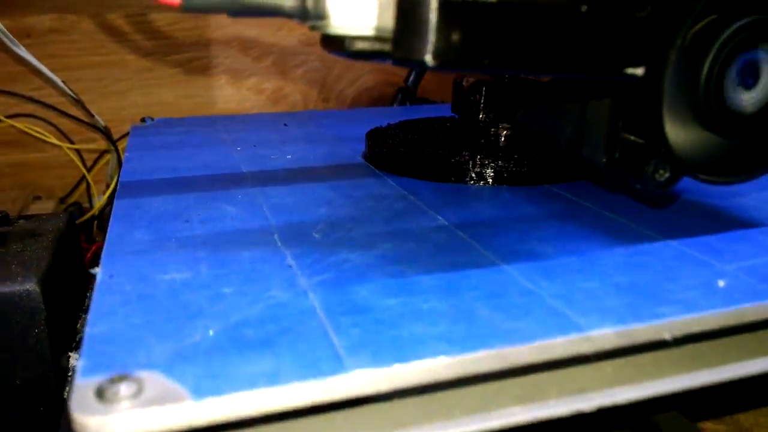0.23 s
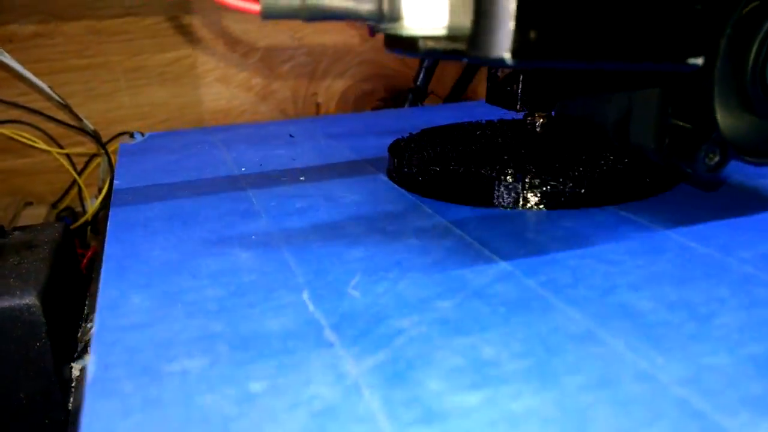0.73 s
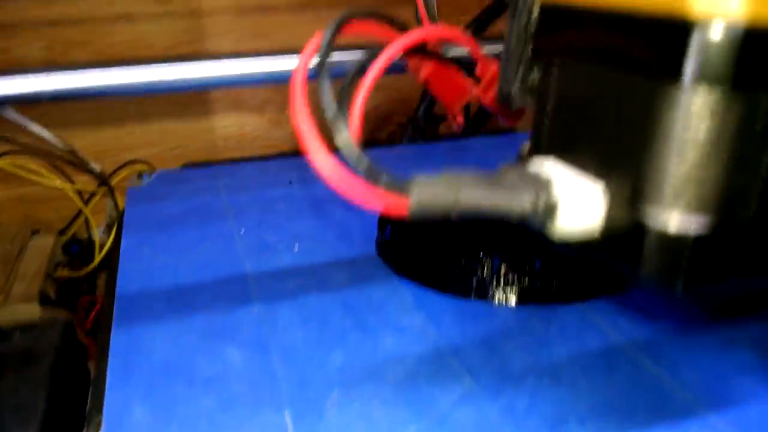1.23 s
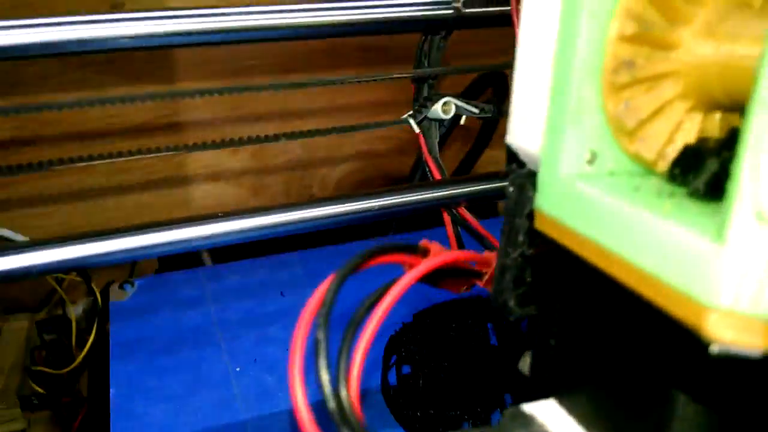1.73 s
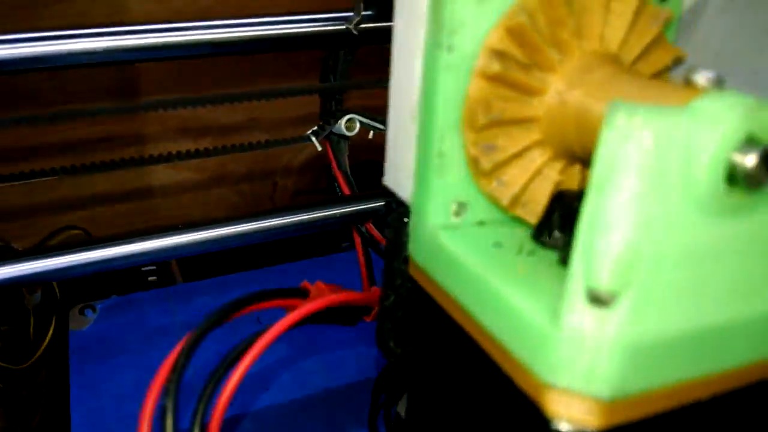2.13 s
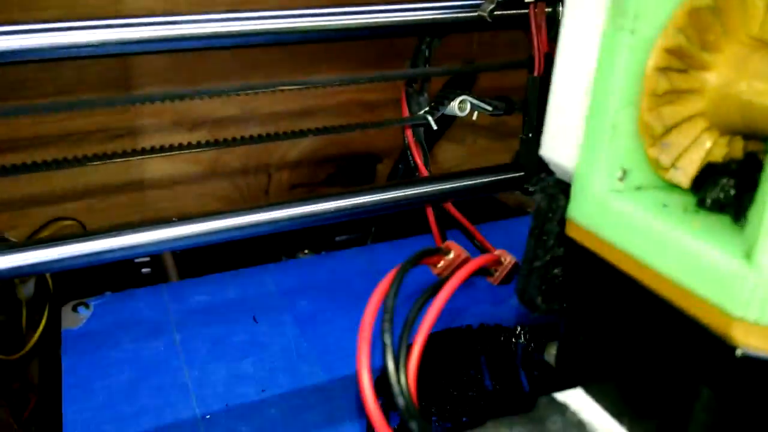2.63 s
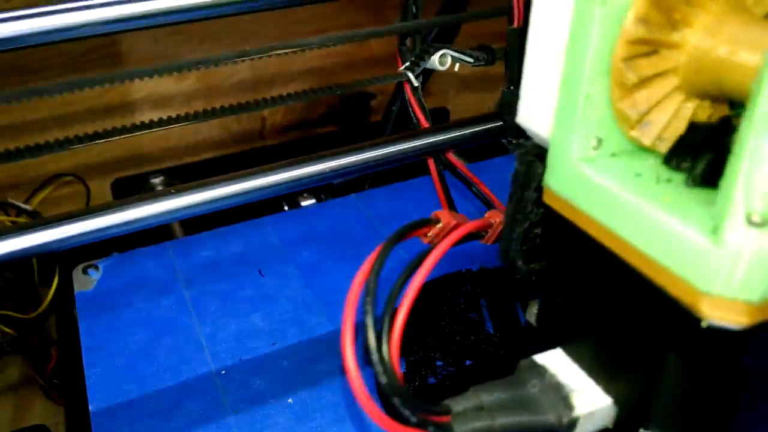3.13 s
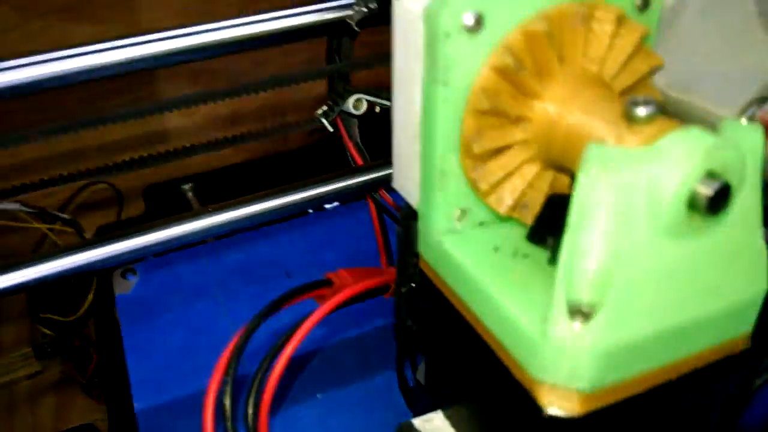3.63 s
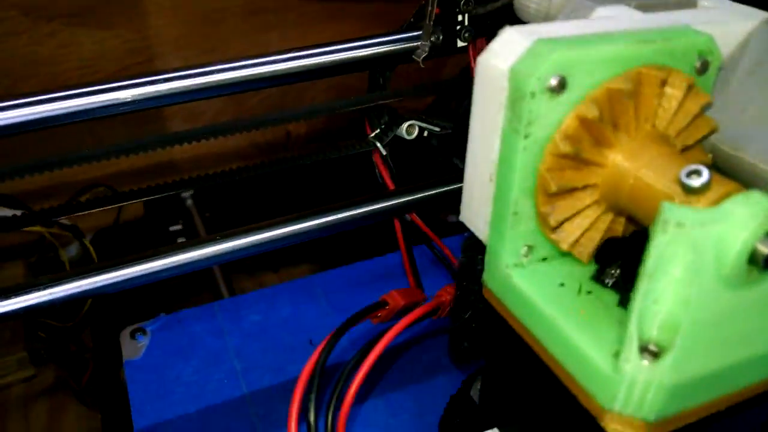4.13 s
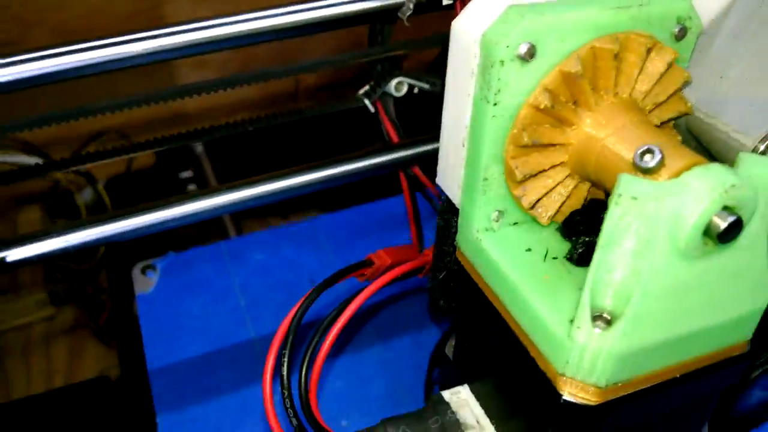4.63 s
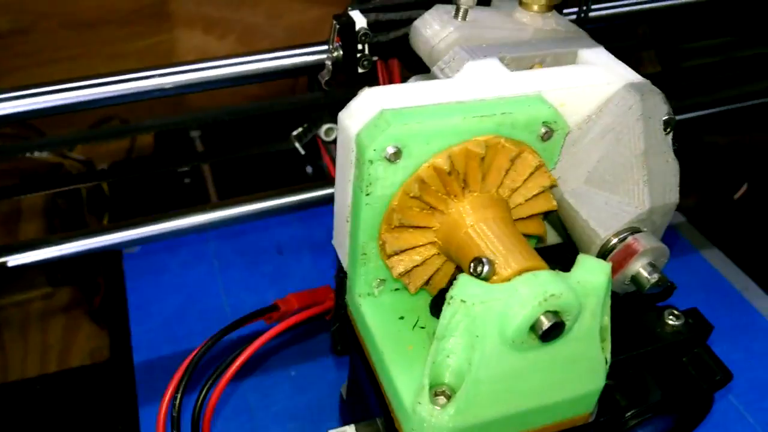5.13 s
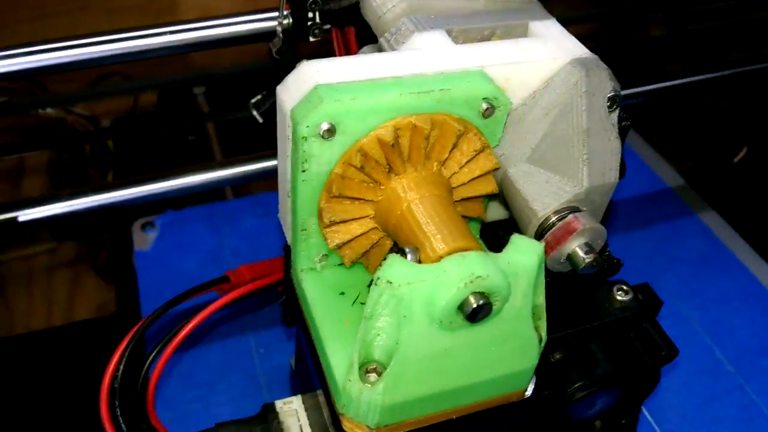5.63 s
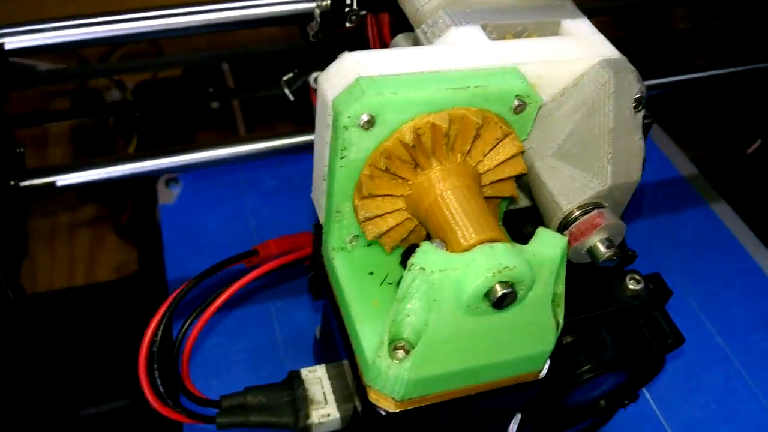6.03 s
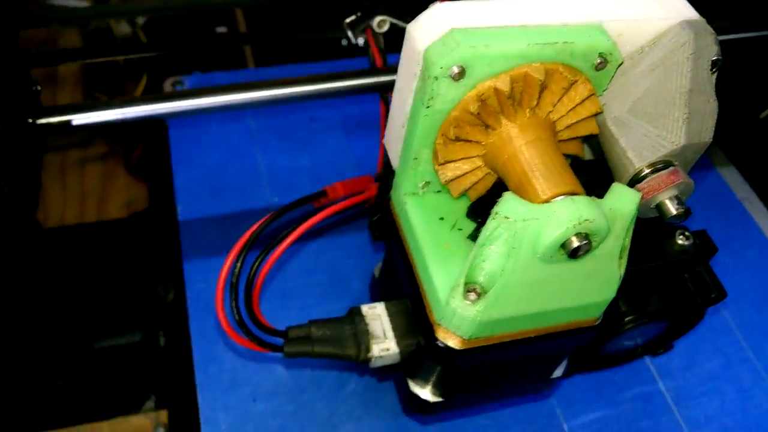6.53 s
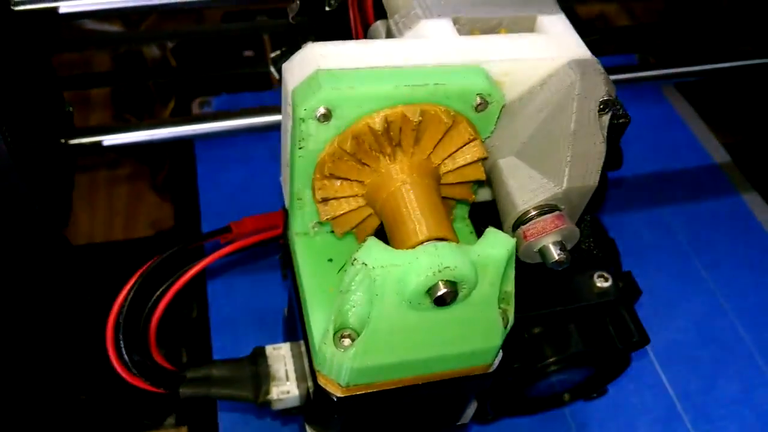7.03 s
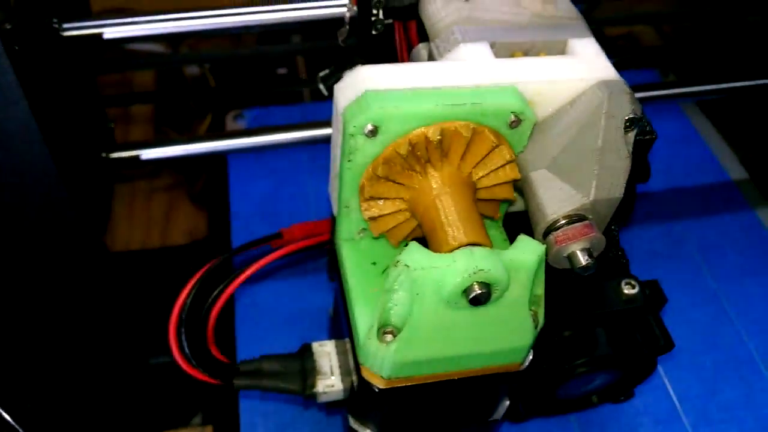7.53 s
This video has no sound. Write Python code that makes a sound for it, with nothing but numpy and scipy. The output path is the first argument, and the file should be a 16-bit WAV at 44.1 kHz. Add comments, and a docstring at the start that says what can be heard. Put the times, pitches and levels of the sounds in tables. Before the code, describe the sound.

Close up, printer motors sweep up, hold piercing tones and drop again, broken by stuttering jogs, bed rumbles and one sharp plastic knock.

```python
"""Singing chirps of a desktop 3D printer laying infill, close to a two-port camera microphone: long strokes and jogs.
Two stepper motors ramp up, cruise and brake, as sines at their step rates, rung through the frame.
Swelling low sines make short shudders of the bed; noise bands rattle, scrape, tick, bump and whistle.
Coloured noise and unsteady hum lines make fans and bearings; damped sines make one sharp knock.
Stereo widening and a gain control that ducks after peaks finish the sound."""
import sys
import numpy as np
from scipy import signal
from scipy.fft import rfft, irfft, next_fast_len
from scipy.io import wavfile
from scipy.ndimage import uniform_filter1d

SR = 44100
rng = np.random.default_rng(int(sys.argv[2]) if len(sys.argv) > 2 else 0)


def generate_wav(signal):
    """Clip the signal to [-1, 1] and save it as 16-bit WAV at the path in sys.argv[1]."""
    frames = np.transpose(np.atleast_2d(signal))
    scaled = np.clip(frames, -1, 1) * 32767
    pcm = np.round(scaled).astype(np.int16)
    wavfile.write(sys.argv[1], SR, pcm)


N = 343098

STROKE_S = .52  # every long stroke lasts this long
CRUISE_MM_S, CORNER_MM_S, ACCEL_MM_S2 = 70, 8, 970
# long strokes, out and back on each heading in turn: start t/s, heading, fast motor level/dB,
# slow motor level/dB, overtones level/dB, rise of the fast motor along the stroke/dB
STROKES = [(.347, "a", 3, 1, -0.5, 0), (.849, "b", -.5, -19, -1.5, -9), (1.762, "b", -3, -6.5, -3, 15),
           (2.294, "c", -1, 3, -1, -3), (3.237, "c", -3.5, 2, -1, 0), (3.747, "a", 0.5, -12, 0, -3),
           (4.68, "a", -2, -7.5, -0.5, -1), (5.198, "b", -4, -8.5, -2.5, 7), (6.093, "b", .5, -7, -2, 13),
           (6.618, "c", -3, -0.5, -5.5, 0), (7.558, "c", -1.5, 0.5, -3.5, 1)]
# two modes of the print bed: f/Hz, width/Hz
BED_MODES = [(255, 58), (500, 65)]


def undb(db):
    """Turn decibels into an amplitude factor."""
    return 10 ** (np.asarray(db) / 20)


def walk(rate, size):
    """A smooth random wander with spread near 1, given `rate` new points a second."""
    at = np.arange(size) * rate / SR
    count = int(at[-1]) + 2
    points = np.clip(rng.standard_normal(count), -2, 2)
    return 1.17 * np.interp(at, np.arange(count), points)


def shape(x, gain):
    """Filter by a gain given as a function of frequency."""
    size = next_fast_len(len(x) + 512)
    f = np.arange(size // 2 + 1) * SR / size + 1e-3
    return irfft(rfft(x, size) * gain(f), size)[:len(x)]


def bell(f, hz, width):
    """A resonance curve, 1 at its centre."""
    return 1 / (1 + (2 * (f - hz) / width) ** 2)


def band(hz, width, size):
    """Noise ringing in one resonance, rms 1."""
    resonance = lambda f: 1 / (1 + ((f / hz - hz / f) * hz / width) ** 2)
    x = shape(rng.standard_normal(size), resonance)
    return x / x.std()


def add(out, start, x):
    """Mix x into out from a start time in seconds."""
    i = int(start * SR)
    lo, hi = max(i, 0), min(i + len(x), N)
    out[lo:hi] += x[lo - i:hi - i]


def bursts(table, grain_db):
    """Short bursts of grainy band noise: quick fades at the ends, a level falling in between."""
    out = np.zeros(N)
    for s, length, hz, width, db in table:
        size = int(length * SR)
        grains = band(hz, width, size) * undb(grain_db * walk(395, size))
        envelope = signal.windows.tukey(size, .2) * np.linspace(1.2, .7, size)
        add(out, s, undb(db) * grains / grains.std() * envelope)
    return out


def steppers():
    """Each move ramps up, cruises and brakes; all tones follow the speed. Returns the sound and the speed."""
    # step rates at cruising speed on each heading: fast motor f/Hz, slow motor f/Hz
    step_rates = {"a": (5163, 2137.3), "b": (4436, 3402), "c": (5545, 729.7), "d": (4274, 2137.3)}
    # full-step hum, harmonics, sum and difference tones of the motors on each heading; they reach the moving
    # camera differently on early and late strokes: f/Hz at cruising speed, early level/dB, late level/dB
    overtone_lines = {"a": [(322, -30, -27.5), (491, -35, -40.5), (644, -41.5, -46), (969, -49, -56),
                      (1044, -48, -45), (1132, -56, -44.5), (1290, -52, -57), (1410, -60, -51),
                      (1615, -60, -52), (1706, -60, -57), (1940, -46, -40), (4180, -45, -50),
                      (4300, -52, -54), (4517, -55, -49), (4820, -41, -46), (5486, -54, -48),
                      (7460, -46, -44), (10340, -27, -35), (12600, -47, -45), (15493, -37, -36)],
                      "b": [(276, -24.5, -22.5), (666, -42, -46.5), (1115, -50, -47.5), (1950, -56, -42.5),
                      (2080, -42, -39), (2790, -47, -42.5), (5490, -42, -42.5), (8670, -48, -42),
                      (8872, -31.5, -32.5), (13308, -36, -36), (13442, -51, -51), (14341, -47, -42)],
                      "c": [(183, -34, -30), (228, -32.5, -30), (274.5, -34.5, -29), (1039, -50, -47),
                      (1394, -50.5, -39), (1454, -37.5, -43.5), (2114, -44.5, -44.5), (2940, -50, -41),
                      (4390, -45, -45), (7520, -42, -43), (10700, -44, -49), (11040, -38.5, -45)]}
    # moves on each heading count as late from here: t/s
    late_from = {"a": 2, "b": 1.5, "c": 5}
    # tones the fast motor grinds out on the ramps: multiple of its step rate, level/dB on top of the motor's
    grind_lines = [(3 / 8, -14), (1 / 2, -10), (3 / 4, -8), (3 / 2, -13)]
    # scale of the speed wobble added all through a move on each heading: share of the speed
    flutter = {"a": .0011, "b": .0004, "c": .0011, "d": .0006}
    # level of the highest motor tones as the camera moves: t/s, level/dB at 9 kHz and above
    shrill = [(0, 0), (.8, -1), (.93, -6.5), (1.1, 2.5), (1.19, 1.5), (1.3, -4), (1.6, -2), (2.2, -2),
              (2.4, -1.5), (2.75, -1.5), (3.3, 1), (3.5, -1), (3.8, 0), (5.2, 0.5), (5.45, 1), (5.7, 0.5),
              (6.2, -3), (6.7, -2.5), (7.78, 1)]
    hunt = .042  # scale of the extra speed wobble on the ramps, as a share of the speed
    slip_db, chatter_db = -2.2, 2.3  # on the ramps the tones are weaker and stutter

    steps, overtones, pace = np.zeros((3, N))
    for start, length, heading, corner, fast_db, slow_db, over_db, rise_db in moves():
        t = np.arange(max(int(length * SR), 256)) / SR
        edge = np.minimum(t, t[-1] - t)  # seconds to the nearer end of the move
        speed = np.minimum(corner + ACCEL_MM_S2 * edge, CRUISE_MM_S) / CRUISE_MM_S
        # on the ramps the rotors hunt a little, which roughens the chirps
        hunting = np.minimum((1 - speed) * 8, 1)
        wobble = hunt * hunting * walk(700, len(t)) + flutter[heading] * walk(40, len(t))
        travel = 2 * np.pi * np.cumsum(speed * (1 + wobble)) / SR
        stutter = undb(hunting * (slip_db + chatter_db * walk(260, len(t))))
        grip = np.sqrt(2) * stutter * np.minimum(edge / .004, 1)
        shrill_db = np.interp(start + t, *np.transpose(shrill))

        def tone(hz, db):
            """A sine that follows the travel; the load on the belts varies, so it wavers a little."""
            waver = undb(walk(50, len(t)) + walk(8, len(t)) + shrill_db * min(hz / 9000, 1))
            return undb(db) * waver * np.sin(hz * travel + 2 * np.pi * rng.random())

        fast_hz, slow_hz = step_rates[heading]
        rising_db = fast_db + rise_db * (t / length - .5) * (1 - hunting)
        grind = hunting * sum(tone(multiple * fast_hz, fast_db + db) for multiple, db in grind_lines)
        add(steps, start, grip * (tone(fast_hz, rising_db) + tone(slow_hz, slow_db) + grind))
        if heading in overtone_lines:
            drive = undb(over_db) * grip * speed ** 14  # overtones only come out near full speed
            late = start > late_from[heading]
            lines = overtone_lines[heading]
            chord = sum(tone(hz, late_db if late else early_db) for hz, early_db, late_db in lines)
            add(overtones, start, drive * chord)
        add(pace, start, speed)
    return frame(steps) + overtones, np.minimum(pace, 1)


def moves(jog_overtones_db=0.0):
    """All moves of the head: start s, length s, heading, corner mm/s, fast, slow, overtones and rise dB."""
    # short jogs between the strokes: start t/s, length/s, heading, speed at the corners/(mm/s),
    # fast motor level/dB, slow motor level/dB
    jogs = [(-.06, 0.12, "a", 9.5, 4, -12), (0.049, 0.14, "d", 21, 0.5, 1), (.192, 0.096, "a", 9, 2, -1),
            (.286, 0.077, "a", 10.6, -6, 4), (1.371, 0.094, "b", 8.9, -2, 2),
            (1.445, 0.072, "b", 15, 0, 2.5), (1.511, .13, "b", 27.5, -14, 0),
            (1.642, 0.062, "b", 14.4, 2, 2), (1.705, 0.076, "b", 12, 1, 2), (2.259, .044, "b", 21, 7, -1),
            (2.788, 0.093, "c", 9.5, 4.5, -7), (2.938, 0.16, "c", 10, 2.5, -5),
            (3.103, 0.052, "a", 2.07, -10, 3), (3.141, 0.099, "c", 9.2, 3, -5),
            (3.73, 0.042, "a", 10.8, 4, -13), (4.267, 0.055, "a", 6.3, 1.5, -9),
            (4.333, .078, "a", 8.4, 2, -1), (4.402, 0.12, "d", 31, 1, 0), (4.535, 0.076, "a", 8.5, 1, -4),
            (4.612, 0.069, "a", 9.8, -4, -1), (5.699, 0.088, "b", 9, -5, -6),
            (5.773, 0.078, "b", 15, -2, -11), (5.847, 0.14, "b", 26, -11, -1),
            (5.976, 0.06, "b", 16, -2, -11), (6.034, 0.077, "b", 11.4, -10, -15),
            (6.586, 0.047, "b", 27, 0, -7), (7.123, 0.097, "c", 10.4, -1, -6),
            (7.27, 0.15, "c", 10.3, -1, -6.5), (7.435, 0.053, "a", 2.2, -13, 0.5),
            (7.475, 0.098, "c", 9.2, -2, -1)]
    strokes = [(start, STROKE_S, heading, CORNER_MM_S, *levels) for start, heading, *levels in STROKES]
    return strokes + [(*jog, jog_overtones_db, 0) for jog in jogs]


def frame(x, between_db=-46, size=8192):
    """The frame lifts tones near its resonances and rings on after they have swept past."""
    # frame resonances that a step tone sweeps through: f/Hz, width/Hz, level/dB
    frame_modes = [(260, 65, -15), (513, 63, -22), (770.4, 76, -29.5), (1140, 310, -37.5), (1650, 400, -37),
                   (2029, 170, -28), (2750, 260, -32), (3410, 600, -37), (4472, 330, -30.5),
                   (5220, 300, -37.5), (5545, 300, -48)]
    f = np.arange(size // 2 + 1) * SR / size
    power = sum((undb(db) * bell(f, hz, width)) ** 2 for hz, width, db in frame_modes)
    gain = np.sqrt(undb(between_db) ** 2 + power)
    # fold the cepstrum to minimum phase, so that the ringing follows the tone
    causal = irfft(np.log(gain))[:size // 2] * np.minimum(np.arange(size // 2) + 1, 2)
    return signal.fftconvolve(x, irfft(np.exp(rfft(causal, size))))[:N]


def shudders(length=.06, trim_db=1):
    """Short low shudders of the bed as a move starts, turns or brakes and step tones sweep through its two modes."""
    # centred on t/s, low mode level/dB, high mode level/dB, both before the trim
    swells = [(.075, -26, -28), (.207, -19, -21.5), (.293, -29, -22.5), (.797, -34, -25.5),
              (.824, -23, -34), (.872, -16.5, -29), (1.368, -15.5, -25.5), (1.455, -20.5, -43),
              (1.533, -21, -32), (1.708, -30, -38), (1.783, -23, -28.5), (2.33, -19, -28), (2.77, -33, -26),
              (3.11, -28, -31), (3.156, -26, -35), (3.255, -22, -30), (3.722, -27, -29), (3.791, -24, -32),
              (4.41, -25, -29), (4.54, -25, -30), (4.622, -31, -23), (5.158, -23, -36), (5.212, -20, -32),
              (5.7, -28, -35), (5.786, -22.5, -34), (5.864, -23, -33), (6.041, -21, -38),
              (6.114, -22.5, -27), (6.665, -23, -27), (7.075, -30, -27), (7.14, -21.5, -28.5),
              (7.44, -22, -25.5), (7.487, -30, -27), (7.585, -20.5, -24.5)]
    out, window = np.zeros(N), np.hanning(int(length * SR))
    t = np.arange(len(window)) / SR
    for s, *levels in swells:
        for (hz, width), db in zip(BED_MODES, levels):
            pitch = hz + width * rng.uniform(-0.33, 0.26)
            swing = np.sin(2 * np.pi * (pitch * t + rng.random()))
            add(out, s - length / 2, np.sqrt(2) * undb(db + trim_db) * window * swing)
    return out


def rattle(pace, hz=760, width=160, bed_db=-35, panel_db=-38, sway_hz=165, sway_width=90, sway_db=-38):
    """Loose parts buzz, the bed rumbles and the frame sways while the head is below 95 % of cruising speed."""
    # carriage buzz as the camera lifts away from the bed: t/s, level/dB
    buzz_levels = [(0, -40.5), (1.7, -40.5), (3.2, -53), (4.6, -71), (7.78, -58)]
    ramping = uniform_filter1d((pace < .95) * 1., SR // 50)
    buzz_db = np.interp(np.arange(N) / SR, *np.transpose(buzz_levels))
    buzz = undb(buzz_db) * band(hz, width, N)
    bed = undb(bed_db) * band(*BED_MODES[0], N) + undb(panel_db) * band(*BED_MODES[1], N)
    sway = undb(sway_db) * band(sway_hz, sway_width, N)
    return undb(3.9 * walk(60, N)) * ramping * (buzz + bed + sway)


def clatters():
    """Loose carriage parts clatter in short bursts of band noise, at turns and now and then in mid-move."""
    # t/s, length/s, centre f/Hz, width/Hz, level/dB
    clatter_bursts = [(.29, 0.033, 750, 150, -33), (.35, 0.027, 740, 170, -27), (.7, .04, 780, 300, -29),
                      (1.365, 0.026, 1300, 900, -34), (1.51, .026, 756, 170, -29.5),
                      (1.72, 0.023, 800, 300, -35), (1.765, .025, 1000, 700, -32),
                      (3.12, 0.029, 756, 120, -31), (5.938, 0.032, 1120, 110, -30.5),
                      (7.33, 0.08, 1000, 400, -36.5), (7.445, 0.027, 760, 100, -34.5)]
    return bursts(clatter_bursts, grain_db=2.0)


def scrapes():
    """The nozzle scrapes and ticks over the print, as rough bursts of band noise."""
    # t/s, length/s, centre f/Hz, width/Hz, level/dB
    scrape_bursts = [(.698, .06, 1000, 1700, -24.5), (.748, .05, 1000, 1700, -26),
                     (2.995, .04, 12000, 4000, -34), (4.995, .03, 1600, 2200, -31),
                     (6.318, .008, 13500, 2500, -30), (6.523, .007, 9300, 2000, -32)]
    return bursts(scrape_bursts, grain_db=3.0)


def whistle():
    """A thin airy whistle near the end: noise in a narrow band."""
    # t/s, length/s, centre f/Hz, width/Hz, level/dB
    whistle_bursts = [(6.5, 1.5, 6740, 150, -45)]
    return bursts(whistle_bursts, grain_db=1.0)


def knock(start=6.2297):
    """One hard knock on plastic, right by the left port: modes struck together, each dying away."""
    # f/Hz, time to fall 60 dB/s, level/dB
    knock_modes = [(687, 0.079, -8), (533, 0.015, -1), (1400, 0.0077, -12.5), (2840, 0.0038, 3),
                   (7800, 0.0039, -2.5)]
    out, t = np.zeros(N), np.arange(SR // 8) / SR
    for hz, t60, db in knock_modes:
        add(out, start, undb(db) * np.sin(2 * np.pi * hz * t) * np.exp(-np.log(1000) * t / t60))
    return out


def bumps():
    """Soft low bumps on the camera, as bursts of band noise."""
    # t/s, length/s, centre f/Hz, width/Hz, level/dB
    bump_bursts = [(7.225, .05, 85, 70, -32), (7.545, .04, 100, 90, -32), (7.62, .04, 110, 90, -34)]
    return bursts(bump_bursts, grain_db=-4)


def rubbing(pace, growl_speed_db=-3.0, hiss_speed_db=3, top_speed_db=5, blend_s=0.061):
    """Levels in dB of growl, hiss and top sizzle of bearings and belts: set by heading and head speed."""
    # on a stroke of each heading, and otherwise ("jog"): growl level/dB, hiss level/dB, top sizzle level/dB
    heading_levels = {"a": (4, -3.5, -2), "b": (1.5, -3.5, -1.5), "c": (1, -4.5, -5.5),
                      "jog": (1.5, -1.5, -1.5)}
    # added as the camera drifts about the printer: t/s, growl level/dB, level/dB of hiss and sizzle
    drift_levels = [(0, 0.5, 0), (1.6, 1.8, 2), (2.6, -0.2, 1), (3.9, 1, 2), (5.1, -0.3, 1), (6.1, 0.8, 2),
                    (6.9, -3, 0.5), (7.78, -2, 1.5)]
    t = np.arange(N) / SR
    levels = np.outer(heading_levels["jog"], np.ones(N))
    for start, heading, *_ in STROKES:
        during = (t >= start) & (t < start + STROKE_S)
        levels[:, during] = np.array(heading_levels[heading])[:, None]
    s, growl_db, hiss_db = np.transpose(drift_levels)
    drift = np.array([np.interp(t, s, db) for db in (growl_db, hiss_db, hiss_db)])
    # the speed terms are the change in dB from standstill to cruise
    by_speed = np.outer([growl_speed_db, hiss_speed_db, top_speed_db], pace - 1)
    return uniform_filter1d(levels, int(blend_s * SR)) + drift + by_speed


def air(spectrum, rub, flutter_db=3.0, ripple_db=5.5, sizzle_db=2.0):
    """Steady fan rush below; above it the fluttering growl and hiss of bearings."""
    # resonances of the casing that colour them: f/Hz, width/Hz, lift/dB
    casing = [(255, 84, 4), (478, 59, 10), (920, 35, 4.5), (1027, 74, 5.5), (1125, 40, 5), (1410, 46, 3.5),
              (1704, 90, 4), (2045, 120, 7), (3120, 790, 6), (4400, 140, 6), (6850, 440, 0.5),
              (8660, 84, 1), (13500, 1000, 7)]
    hz, db = np.transpose(spectrum)
    growl_db, hiss_db, top_db = rub

    def colour(f):
        lift_db = sum(d * bell(f, h, w) for h, w, d in casing)
        return undb(np.interp(np.log(f), np.log(hz), db) + lift_db)

    def below(edge_hz):
        return shape(rush, lambda f: 1 / (1 + (f / edge_hz) ** 6))

    def sizzle(part, part_db):
        return part * undb(part_db + sizzle_db * walk(45, N) + 1.6 * walk(250, N))

    rush = rippled(colour, ripple_db)
    low, mids, treble = below(650), below(2800), below(9500)
    growl = (mids - low) * undb(growl_db + flutter_db * walk(70, N))
    return low + growl + sizzle(treble - mids, hiss_db) + sizzle(rush - treble, top_db)


def rippled(colour, ripple_db, count=3):
    """Coloured noise rippled by many small modes of rods and panels, changing as head and camera travel."""
    spots = np.arange(0, SR / 2, 28)  # Hz
    place, out = np.linspace(0, count - 1, N), 0
    for k in range(count):  # crossfade from one set of ripples to the next
        ripple = ripple_db * np.clip(rng.standard_normal(len(spots)), -2, 2) * np.minimum(spots / 900, 1)
        gains = colour(spots + 1) * undb(ripple)
        noise = shape(rng.standard_normal(N), lambda f: np.interp(f, spots, gains))
        out = out + noise * np.sqrt(np.maximum(1 - abs(place - k), 0))
    return np.sqrt(SR / 2) * out


def fans():
    """Blade tones of the fans: sines whose phase wanders."""
    # f/Hz, level/dB
    blade_lines = [(118.3, -33), (156, -41.5), (183, -42), (228, -39), (275, -40), (352, -43), (469, -42),
                   (489, -43)]
    t, out = np.arange(N) / SR, np.zeros(N)
    for hz, db in blade_lines:
        out += np.sqrt(2) * undb(db) * np.sin(2 * np.pi * hz * t + 0.61 * walk(9, N))
    return out


def scene():
    """The printer stands nearer the right port; the left one shares its bass but little of its treble."""
    # fans and rubbing at the near port, before casing and rubbing levels: f/Hz, level/dB per Hz
    near_air = [(25, -62), (50, -53.5), (80, -47.5), (130, -47), (200, -52.5), (370, -62.5), (600, -67),
                (850, -76), (1600, -84.5), (2700, -81), (4000, -78), (7500, -74.5), (11000, -75),
                (14200, -76)]
    # the same for what only the far port gets: f/Hz, level/dB per Hz
    far_air = [(30, -79), (120, -81), (300, -63.5), (500, -62), (900, -77), (2000, -76), (4000, -80),
               (8000, -83.5), (11000, -86), (14200, -78.5)]
    whine, pace = steppers()
    rub = rubbing(pace)
    shaking = shudders() + rattle(pace) + clatters()
    right = whine + shaking + scrapes() + whistle() + air(near_air, rub) + fans()
    share_hz, shares = [450, 1100, 2000, 4000], [0.72, 0.28, 0.074, 0.072]
    shared = shape(right, lambda f: np.interp(np.log(f), np.log(share_hz), shares))
    left = shared + knock() + bumps() + air(far_air, rub)
    return np.array([left, right])


def record(dry, cross=0.81, limit_db=-3.5, release_db=13, port_lag=17.2, top_hz=15550):
    """Stereo widening takes from each port the delayed other one; gain control ducks after a peak and creeps back."""
    # port_lag is in samples, release_db in dB per second
    delay = lambda f: np.exp(-2j * np.pi * f * port_lag / SR)
    delayed = np.array([shape(x, delay) for x in dry[::-1]])
    wide = dry - cross * delayed
    over = np.maximum(20 * np.log10(np.abs(wide).max(axis=0) + 1e-9) - limit_db, 0)
    creep = release_db * np.arange(N) / SR
    duck_db = np.maximum.accumulate(over + creep) - creep
    attack = 1 / (0.0043 * SR)  # the duck sets in over about 4 ms
    smooth_db = signal.lfilter([attack], [1, attack - 1], duck_db)
    wide = np.clip(wide * undb(-smooth_db), -1, 1)
    return signal.sosfilt(signal.ellip(10, .2, 80, top_hz, fs=SR, output="sos"), wide)


dry = scene()
out = record(dry)
generate_wav(out)
```